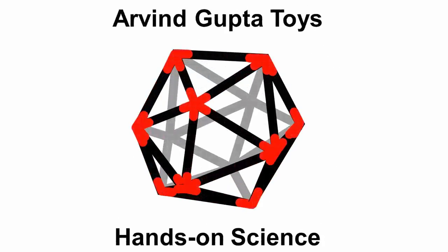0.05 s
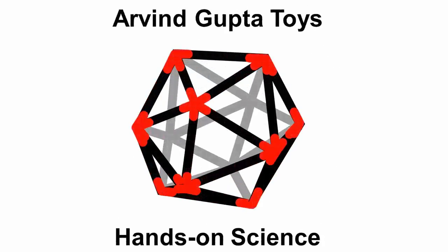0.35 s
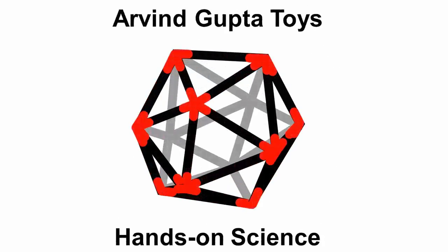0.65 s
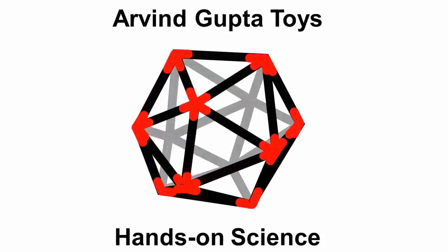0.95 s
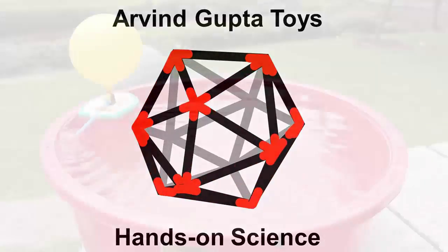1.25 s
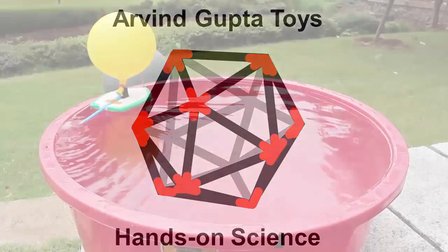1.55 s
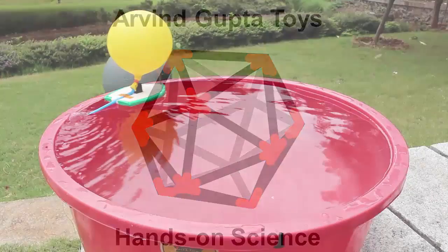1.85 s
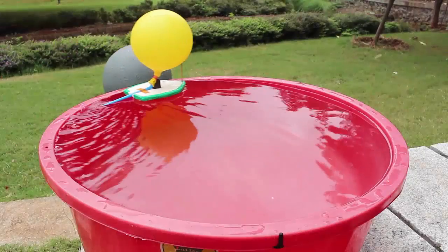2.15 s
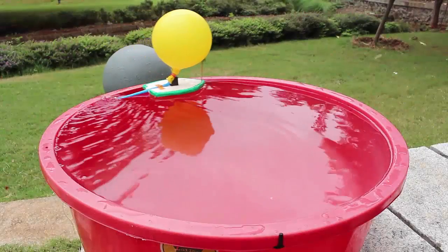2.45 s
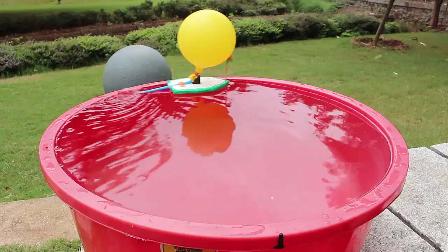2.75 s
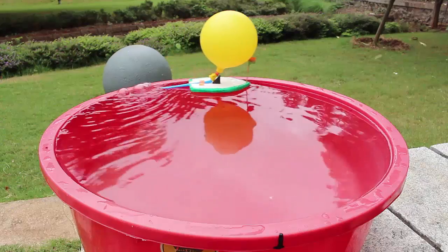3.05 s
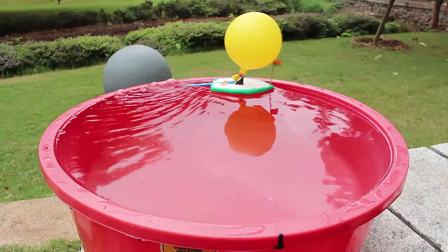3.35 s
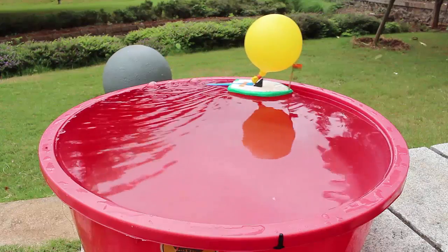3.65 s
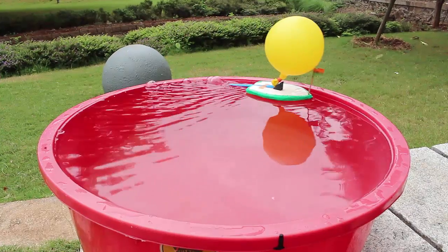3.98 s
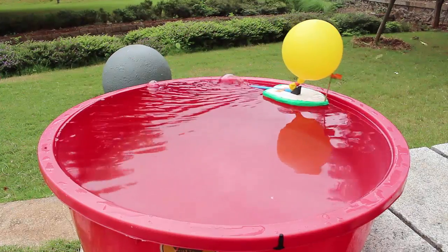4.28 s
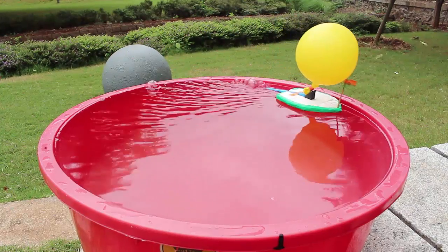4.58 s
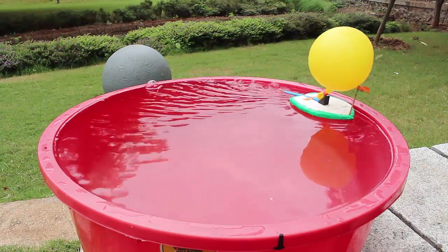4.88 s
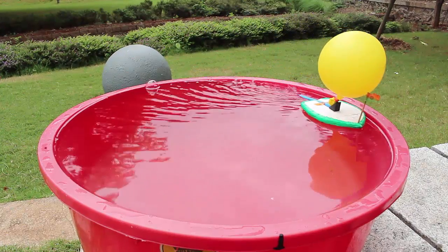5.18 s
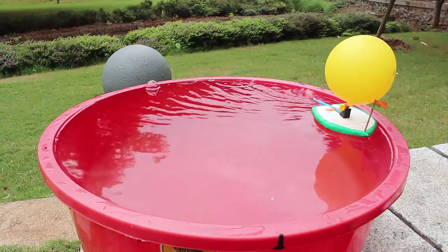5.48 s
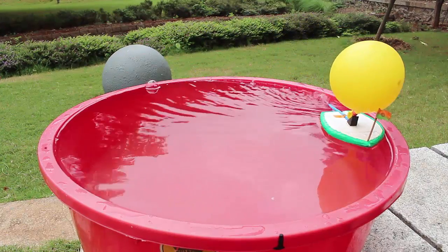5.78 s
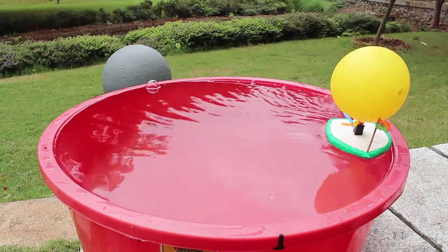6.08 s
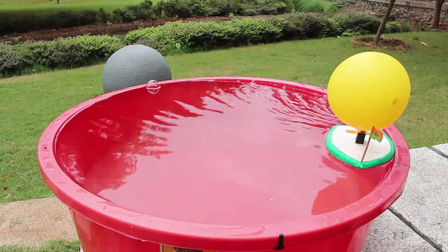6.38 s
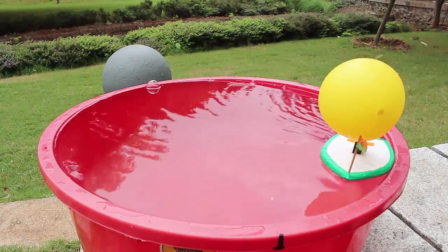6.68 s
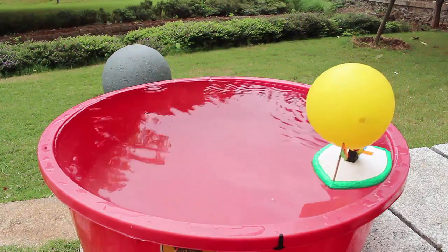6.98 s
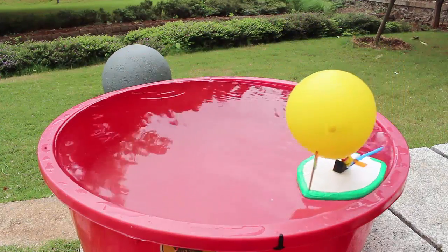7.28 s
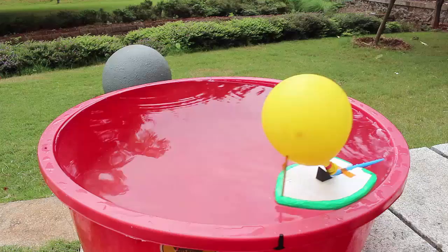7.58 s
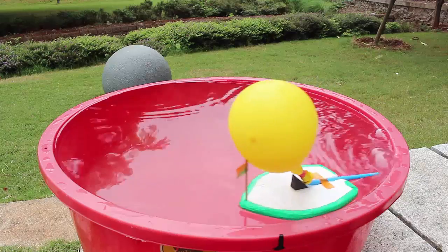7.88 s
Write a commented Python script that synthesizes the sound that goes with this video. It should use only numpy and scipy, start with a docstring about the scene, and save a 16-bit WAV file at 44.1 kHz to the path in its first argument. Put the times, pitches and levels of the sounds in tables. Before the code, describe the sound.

After brief dull room noise, a balloon-driven toy boat sputters and bubbles air through a straw in a tub of water.

```python
"""A balloon-driven toy boat sputters round a plastic tub outdoors, blowing through a straw at the waterline.
Bubbles burst and their cavities ring, air whistles through swelling and shrinking pockets of water,
and the jet hisses amid fine spray. The straw's air column and an echo off the tub wall colour the sound,
over a low churning of water. Dull room noise comes first and gives way abruptly to the boat at 1.64 s."""
import sys
import numpy as np
from scipy import signal
from scipy.fft import rfft, irfft
from scipy.io import wavfile
from scipy.ndimage import map_coordinates

SR = 44100
rng = np.random.default_rng(int(sys.argv[2]) if len(sys.argv) > 2 else 0)


def transcribe(u):
    """Save the signal u as a 16-bit wav file named by the first command-line argument.

    u: samples, shape (n,) or (channels, n), limited to [-1, 1]; the rate is SR.
    q: integer samples, one column per channel.
    """
    v = np.clip(np.atleast_2d(u).T, -1, 1)
    q = np.round(v * 32767).astype(np.int16)
    wavfile.write(sys.argv[1], SR, q)


N = 349713
TIME = np.arange(N) / SR
BOAT_START_S, BAND_LIMIT_HZ, TYPICAL_BURST_HZ = 1.638, 16100, 2000
RING_GLIDE_OCTAVES = 0.052  # rise in pitch during one decay time

# Levels in the tables are relative: each source applies its own gain.
# loud bursting bubbles: t/s, ring level/dB, f/Hz, ring decay time/s, snap level/dB
BURSTS = [(1.6414, -3, 2030, 0.004, -19), (1.6541, -1.6, 960, 0.00073, -24),
          (1.6657, 4.5, 1050, 0.0015, -9), (1.6836, 5, 1370, 0.004, -4), (1.7087, 5, 2850, 0.0027, -16),
          (1.7262, 2, 3050, 0.0036, -14), (1.7722, 5.5, 2030, 0.0015, -16), (1.7842, 10, 2220, 0.001, -9),
          (1.822, -4, 920, 0.001, -19), (1.8336, 8.5, 1080, 0.0007, -5), (1.9207, 3, 1225, 0.0013, -4.5),
          (1.9345, -3.5, 800, 0.0041, -15), (1.9898, 4, 2200, 0.0012, -12), (2.0756, 5.5, 2010, 0.003, -6),
          (2.159, -4.5, 900, 0.0014, -14), (2.1732, 9, 3040, 0.001, -3), (2.2864, 1.8, 2290, 0.00038, -13),
          (2.3897, -2, 875, 0.0037, -10), (2.4951, 2.1, 2060, 0.003, -15), (2.508, 4.5, 3050, 0.001, -10),
          (2.5387, 6.5, 3000, 0.0013, -9), (2.5517, 1.4, 830, 0.0039, -17),
          (2.5693, -2.5, 1180, 0.0021, -15), (2.589, -9, 1490, 0.0022, -10), (2.6347, 1, 950, 0.0011, -9),
          (2.6581, -4, 840, 0.0034, -10), (2.6994, 0.6, 2060, 0.0025, -16), (2.7236, -3, 1970, 0.0034, -16),
          (2.7814, 0.5, 900, 0.003, -15), (2.7904, -2.5, 960, 0.00067, -7), (2.8242, -3, 1400, 0.0006, -22),
          (2.843, 2.5, 1310, 0.0028, -17), (2.9197, 1.5, 830, 0.0037, -4), (3.0172, 2.5, 930, 0.003, -28),
          (3.0252, 7.5, 1470, 0.00031, 3.5), (3.0637, -2.5, 1280, 0.0029, -25),
          (3.1084, -1.5, 894, 0.0033, -22), (3.1277, -1.5, 980, 0.0015, -19),
          (3.1363, 8.5, 1410, 0.0023, -9), (3.2232, -2, 3140, 0.0014, -6), (3.2407, 5, 1880, 0.0014, -15),
          (3.3326, -1.6, 920, 0.002, -4.5), (3.342, 2.5, 1410, 0.0008, -8), (3.4225, -3, 903, 0.0029, -30),
          (3.4426, 4.1, 815, 0.0058, -4), (3.5388, 4.4, 2100, 0.00016, -28), (3.5512, 5.5, 850, 0.0027, -2),
          (3.5867, -2.1, 980, 0.0014, -13), (3.6226, 3, 2000, 0.00086, -22), (3.642, -3, 810, 0.0014, -13),
          (3.6726, -6, 920, 0.0011, -8), (3.733, -1.5, 1820, 0.002, -19), (3.8262, -4, 3000, 0.0006, -20),
          (3.8372, 3.5, 1620, 0.0006, -5), (3.8477, 6.5, 846, 0.0023, -0.5), (3.9207, -3, 920, 0.002, -12),
          (3.9317, -1.5, 902, 0.0014, 0.5), (3.9771, -0.7, 1670, 0.0034, -14),
          (4.0955, 4.0, 3070, 0.0027, -6), (4.1368, 2, 946, 0.001, -14), (4.157, 8, 2630, 0.00036, -4),
          (4.2837, -2, 1930, 0.003, -17), (4.2985, -2, 2060, 0.00025, 0.5), (4.311, 6, 1250, 0.0027, -12),
          (4.4108, 1, 1320, 0.0031, -10), (4.4242, -0.5, 1990, 0.002, -12), (4.5528, -3.5, 985, 0.0028, -7),
          (4.569, -1, 1390, 0.0044, -4.5), (4.6346, -1, 3100, 0.0004, 6), (4.6699, 2.5, 1960, 0.0029, -9),
          (4.7541, 1, 1570, 0.003, -16), (4.7659, 6.5, 1920, 0.0023, -11), (4.8512, 7.5, 1760, 0.0047, -6),
          (4.9246, 10.5, 2080, 0.0013, -8), (4.935, 3.5, 2150, 0.00081, -2),
          (4.9878, -0.5, 1510, 0.0025, -1.5), (5.0021, -2.5, 843, 0.0013, -5),
          (5.0568, -3.5, 900, 0.0014, -1.5), (5.1894, 1, 1890, 0.00031, -0.5),
          (5.2654, 0.5, 2100, 0.0049, -14), (5.2871, -0.8, 2260, 0.001, -3.5),
          (5.3178, -9, 1620, 0.0047, -6), (5.3323, -2.8, 1960, 0.0022, -8), (5.368, 3.1, 2110, 0.0014, -6),
          (5.3811, 2.8, 1990, 0.0012, -7), (5.442, 5.5, 2040, 0.0021, -8), (5.5181, 3.5, 2650, 0.00043, -1),
          (5.543, -4.1, 930, 0.005, -12), (5.5833, 6.5, 1370, 0.0035, 2.5), (5.5961, -6, 820, 0.0022, -13),
          (5.6645, 1.5, 2130, 0.0022, -7), (5.778, 3.5, 1610, 0.003, -9), (5.7936, 1, 2790, 0.0017, -14),
          (5.8806, 2, 1910, 0.002, -5.5), (5.9527, -0.4, 1920, 0.0006, -4), (5.9641, 4.5, 2360, 0.0006, 4),
          (6.1279, 2, 2280, 0.0012, -1.5), (6.1369, 0, 2110, 0.002, -1.5), (6.2101, 0, 2130, 0.0045, -2),
          (6.2222, 9, 2800, 0.0005, -3), (6.2609, 9.5, 2360, 0.0013, 8), (6.3043, 5.5, 2080, 0.0026, 1),
          (6.3397, 9, 2170, 0.0024, -5), (6.4537, -0.5, 3030, 0.003, -6), (6.5066, 11, 2820, 0.00041, 2),
          (6.5197, -0.5, 1550, 0.0004, 2), (6.6018, 4, 2130, 0.0034, -22), (6.622, 9.5, 2860, 0.00082, 2),
          (6.6376, 6, 1900, 0.0037, 1), (6.6913, -3, 2940, 0.00037, -3), (6.7532, -3, 1600, 0.002, -4),
          (6.7984, 2, 2660, 0.00037, -2), (6.812, 5, 2820, 0.00066, 2.5), (6.9018, 4.1, 3040, 0.00027, 1),
          (6.9766, 11, 2930, 0.0012, 2.5), (6.9963, -4.5, 1780, 0.004, -1), (7.148, 1.5, 2010, 0.004, -1.5),
          (7.1688, 7.5, 2750, 0.00037, 5.5), (7.2081, 4.5, 2840, 0.00047, -2),
          (7.2572, 5, 1860, 0.00015, 3), (7.2794, -4, 1860, 0.0017, -17), (7.3453, -1, 2030, 0.0015, -7),
          (7.3589, 7.5, 2280, 0.00083, 3.5), (7.432, -0.5, 1900, 0.00052, -5),
          (7.4697, 8.5, 2970, 0.00076, 5.5), (7.5207, 8, 2970, 0.00092, 2.5), (7.5596, -2, 2230, 0.004, -9),
          (7.5768, -1, 2440, 0.0011, 1), (7.6352, -1.5, 2940, 0.00054, -1), (7.74, 2.7, 2750, 0.00044, -2),
          (7.873, 7, 1960, 0.00017, -5)]
# spectrum of the knock that a burst gives the straw: f/Hz, level/dB
KNOCK_SPECTRUM = [(100, -31), (350, -23), (600, 1.5), (900, 1.5), (1300, -6), (2000, 3.5), (3000, -22.5),
                  (6000, -31.5), (16000, -75)]
# spectrum of a tearing film: f/Hz, level/dB
SNAP_SPECTRUM = [(300, -18.5), (1200, -10.5), (2200, 3.5), (3400, 6.5), (5000, -1.5), (7500, 0),
                 (10000, -14), (13000, -25.5), (16000, -19)]
# modes of the straw's air column: f/Hz, bandwidth/Hz, peak height/dB
STRAW_MODES = [(910, 220, 10), (2100, 420, 5), (3130, 350, 8), (4500, 280, 10), (5880, 480, 11),
               (6950, 550, 6), (8050, 380, 8), (9600, 450, 7), (10600, 450, 6), (12100, 750, 9),
               (13600, 450, 5)]
# raspy squirts of air: t/s, duration/s, level/dB, first f/Hz, last f/Hz
AIR_SQUIRTS = [(1.69, .045, -30, 2180, 3770), (1.76, .05, -33, 2200, 4730),
               (1.995, 0.042, -31.5, 2100, 3470), (2.08, 0.048, -34, 2670, 3750),
               (2.175, 0.075, -37, 2500, 3900), (2.373, .028, -34, 4100, 2470),
               (2.5, 0.069, -40, 2470, 5540), (2.71, 0.099, -34, 2000, 4030),
               (2.807, .035, -43, 3020, 1100), (3.203, .041, -40, 3570, 1750),
               (3.484, 0.057, -37, 4160, 2100), (3.6, 0.055, -33.5, 2100, 4450),
               (3.677, .06, -40, 3330, 1720), (3.8, 0.034, -46, 3000, 1800),
               (4.038, .055, -34.5, 1580, 4600), (4.53, .05, -37, 2000, 1400),
               (4.879, 0.055, -47, 4260, 2280), (5.022, 0.024, -42, 2930, 1470),
               (5.068, .036, -34.5, 3000, 2000), (5.27, 0.086, -39, 2690, 1910),
               (5.4, 0.084, -38, 1800, 2800), (5.8, .05, -34, 2320, 3140),
               (5.983, 0.027, -31.5, 4150, 2050), (6.227, 0.027, -34, 4240, 2920),
               (6.457, 0.038, -33.5, 2600, 3560), (6.57, 0.053, -35, 2100, 3600),
               (6.66, 0.057, -32, 1600, 3540), (7.15, .06, -45, 2200, 4500)]
# sound of the air flow: t/s, gurgle level/dB, hiss level/dB
AIR_FLOW = [(1.64, -39, -44), (1.83, -41, -49.5), (2.85, -38, -47.5), (3.64, -35, -45.5), (4.3, -41, -44.5),
            (5.48, -40.5, -43.5), (6.37, -44.5, -42.5), (6.72, -40.5, -37.5), (7.93, -44, -45)]
# focused band of the jet's hiss: t/s, f/Hz, level/dB
JET_BAND = [(1.7, 5960, -79), (2.4, 6430, -57.5), (3.1, 6260, -51), (3.6, 6550, -53), (4.4, 7130, -52),
            (5.7, 6980, -59), (7.0, 7000, -65), (7.9, 7100, -58)]
# hiss spectrum with the boat on the far side: f/Hz, level/dB
FAR_HISS_SPECTRUM = [(300, 2), (900, 8), (2000, -18), (3500, 10), (5000, 4), (6500, 9), (9000, 0),
                     (12000, -1), (16000, -11)]
# hiss spectrum with the boat on the near side: f/Hz, level/dB
NEAR_HISS_SPECTRUM = [(300, -6), (900, -24), (2000, 8), (3500, 12.5), (5000, 3.5), (6500, 11.5),
                      (9000, 1.5), (12000, -3.5), (16000, -15)]
# spurts of fine spray: t/s, nominal duration/s, level/dB
SPRAY_SPURTS = [(1.803, 0.021, -45), (2.217, .035, -43), (2.76, 0.033, -41), (2.817, .015, -39),
                (2.962, .02, -41), (3.257, .06, -39.5), (3.37, .012, -39), (3.47, 0.052, -43.5),
                (3.652, 0.066, -41.5), (3.867, 0.094, -38), (4.07, 0.032, -41), (4.64, 0.044, -32),
                (4.885, 0.028, -35), (5.027, 0.018, -39.5), (5.838, 0.02, -42.5), (5.99, 0.074, -38.5),
                (6.103, .025, -45), (6.235, .022, -45), (6.67, 0.038, -40), (6.95, 0.021, -38),
                (7.185, 0.033, -37), (7.492, .025, -37), (7.593, 0.027, -40)]
# spectrum of the spray: f/Hz, level/dB
SPRAY_SPECTRUM = [(1000, -28), (2500, -7), (4000, 4), (5200, -6), (8000, -0.5), (11000, -0.5),
                  (13000, -5.5), (16000, 2)]
# echo off the tub wall as the boat moves: t/s, delay/ms, reflection factor/1
WALL_ECHO = [(1.7, .505, .42), (2.4, .485, .42), (3.0, .45, .62), (3.5, .41, .28), (4.0, .372, .42),
             (5.0, .3, .3), (6.0, .24, .2), (7.0, .19, .2), (7.9, .19, .15)]
# spectrum of stirred water and open air: f/Hz, level/dB
CHURN_SPECTRUM = [(20, -7), (38, -7), (60, 0.5), (110, -0.5), (180, -6.5), (280, -12.5), (450, -17.5),
                  (800, -25), (2000, -28.5), (8000, -41)]
# opening room noise: t/s, rumble level/dB, hiss level/dB
ROOM_LEVELS = [(0, -40.5, -49.5), (.62, -40.5, -48.5), (.72, -44, -54), (.8, -50.5, -56.5),
               (.9, -55.5, -51), (1.17, -59, -48.5), (1.24, -40.5, -47), (1.36, -52.5, -48),
               (1.62, -56, -52.5)]
# spectrum of the room's rumble: f/Hz, level/dB
ROOM_RUMBLE_SPECTRUM = [(20, -19), (100, -25), (150, -7), (200, -2), (330, -6), (480, -12), (800, -19.5),
                        (1500, -27), (4000, -67)]
# spectrum of the soft opening hiss, with a dip near 11 kHz and faint top hiss above: f/Hz, level/dB
OPENING_HISS_SPECTRUM = [(20, 10), (50, 7), (120, -2), (1000, -3), (2500, -1), (4300, 0), (6000, -10),
                         (8500, -19), (10000, -27), (11500, -32), (15500, -22)]
# soft bumps and a tick in the room: t/s, level/dB, f/Hz, spread/Hz, rise time/s, decay time/s
ROOM_BUMPS = [(0.514, -23, 198, 40, 0.016, 0.026), (0.592, -34, 1900, 1800, .001, 0.0059),
              (1.193, -38.5, 117.7, 110, 0.0056, .1)]


def bursts(ring_db=-1.5, knock_db=-8, snap_db=-2, splash_db=-21, swell_db=-12,
           rise_s=0.00026, splash_s=0.0019, swell_s=0.004, size=500):
    """Impulse excitation: a film snaps with a tiny splash, ringing the cavity and the straw."""
    rings, knocks, snaps = np.zeros((3, N))
    t = np.arange(size) / SR
    for s, db, hz, decay, film_db in BURSTS + small_bursts():
        add(rings, s, with_energy(ring(hz, decay, RING_GLIDE_OCTAVES / decay, rise_s), db + ring_db))
        # the knock grows slowly with the level and pitch of the burst
        add(knocks, s, amp([knock_db + 0.5 * db + 0.5 * np.log2(hz / TYPICAL_BURST_HZ)]))
        splash = amp(splash_db) * rng.standard_normal(size) * np.exp(-t / splash_s)
        add(snaps, s + rise_s, with_energy((t == 0) + splash, film_db))
        # a brief swell of noise just before each snap
        swell = rng.standard_normal(size) * np.exp(-t[::-1] / swell_s)
        add(snaps, s - t[-1], with_energy(swell, film_db + swell_db))
    rings = signal.lfilter(*signal.butter(2, 590, "high", fs=SR), rings)
    knocks = colour(knocks, KNOCK_SPECTRUM, STRAW_MODES)
    return rings + knocks + amp(snap_db) * colour(snaps, SNAP_SPECTRUM, STRAW_MODES)


def small_bursts(per_burst=0.8, scatter_s=0.09, low_hz=900, high_hz=2600, decay_s=0.0019,
                 ring_db=-5.5, snap_db=-10.5, spread_db=2):
    """Random clustering: faint bubbles burst around the loud ones. Gives rows like BURSTS."""
    rows = []
    for which, pitch, late, early, size in rng.random((int(per_burst * len(BURSTS)), 5)):
        s = BURSTS[int(which * len(BURSTS))][0] + scatter_s * (late - early)
        offset_db = spread_db * (2 * size - 1)
        hz = low_hz * (high_hz / low_hz) ** pitch
        rows.append((s, ring_db + offset_db, hz, decay_s, snap_db + offset_db))
    return rows


def ring(hz, decay_s, octaves_per_s, rise_s):
    """Damped oscillation: an air cavity rings briefly, its pitch sliding as its mouth changes."""
    t = np.arange(900) / SR
    pitch = np.minimum(hz * 2 ** (octaves_per_s * t), SR / 2)
    envelope = (1 - np.exp(-t / rise_s)) * np.exp(-t / decay_s)
    return envelope * np.sin(2 * np.pi * np.cumsum(pitch) / SR)


def plops(gain_db=-6, pitch_hz=1180, decay_s=0.0031, brief_s=0.00049, scatter=0.069, rise_s=0.00051):
    """Cavity resonance: after the briefest cracks, water closes round a larger pocket that rings low."""
    out = np.zeros(N)
    for (s, db, _, crack_s, _), detune in zip(BURSTS, rng.standard_normal(len(BURSTS))):
        plop = ring(pitch_hz * np.exp(scatter * detune), decay_s, RING_GLIDE_OCTAVES / decay_s, rise_s)
        add(out, s + rise_s, np.exp(-crack_s / brief_s) * with_energy(plop, db + gain_db))
    return out


def whistles(rows, relative_width, wobble, tick_db, overtone=2.59, overtone_db=-15,
             ticks_per_s=220, overhang_s=0.006):
    """Forced resonance: rushing air and tiny pops drive a pocket whose pitch slides with its volume."""
    out = np.zeros(N)
    ticks = (rng.random(N) < ticks_per_s / SR) * rng.uniform(-1.8, 1, N)
    drive = rng.standard_normal(N) + amp(tick_db) * ticks
    waver = np.exp(wobble * wander(126))
    for s, length, db, first_hz, last_hz in rows:
        n = int((length + 2 * overhang_s) * SR)
        span = slice(int(s * SR) - n, int(s * SR))
        hz = np.geomspace(first_hz, last_hz, n) * waver[span]
        width = relative_width * hz.mean()
        upper = resonate(drive[span], overtone * hz, overtone * width) * (overtone * hz < BAND_LIMIT_HZ)
        sweep = unit(resonate(drive[span], hz, width)) + amp(overtone_db) * unit(upper)
        add(out, s - overhang_s, amp(db) * sweep * signal.windows.tukey(n, 0.4))
    return out


def pockets(lead_s=0.028, trail_s=0.018, octaves_per_s=13.9, spread=0.3, whistle_db=-47,
            lone_per_s=5, lone_db=-42.5, low_hz=1160, high_hz=1860):
    """Resonance rises as a pocket shrinks, through each burst or alone. Gives rows like AIR_SQUIRTS."""
    centres = [(s, hz, whistle_db + 0.2 * db) for s, db, hz, *_ in BURSTS]
    running_s = N / SR - BOAT_START_S
    for when, pitch in rng.random((int(lone_per_s * running_s), 2)):
        centres.append((BOAT_START_S + when * running_s, low_hz * (high_hz / low_hz) ** pitch, lone_db))
    rows = []
    for (s, hz, db), deviation in zip(centres, rng.uniform(-1.1, 1, (len(centres), 3))):
        lead, trail, climb = np.array([lead_s, trail_s, octaves_per_s]) * np.exp(spread * deviation)
        db -= 0.5 * np.log2(hz / TYPICAL_BURST_HZ)
        rows.append((s - lead, lead + trail, db, hz * 2 ** (-climb * lead), hz * 2 ** (climb * trail)))
    return rows


def gurgle(bubbles_db=-5, wash_db=-4, per_s=170, spread_db=11, cycles=2.9, pitches=36):
    """Bubble resonance: many small bubbles ring over a wash of noise in the straw's lowest modes."""
    bubbles = np.zeros(N)
    for hz in np.geomspace(800, 3300, pitches):
        onsets = rng.integers(0, N, int(per_s * N / SR / pitches))
        sizes = np.minimum(rng.exponential(1, len(onsets)), 3)
        glides = rng.normal(12, 36.5, len(onsets))
        for onset, size, glide in zip(onsets, sizes, glides):
            add(bubbles, onset / SR, amp(spread_db * size) * ring(hz, cycles / hz, glide, 0.00056))
    wash = noise(KNOCK_SPECTRUM, STRAW_MODES) * amp(4 * wander(63))
    flow_db, _ = curves(AIR_FLOW)
    return amp(flow_db) * (amp(bubbles_db) * unit(bubbles) + amp(wash_db) * unit(wash))


def jet_hiss(spits_per_s=210, spit_db=5, spit_share=0.18, surge_db=1.15, near_at_s=5.6, turn_s=0.05):
    """Turbulent noise: the jet spits unevenly into the straw's modes, gaining body on the near side."""
    spit_phase = np.cumsum(spits_per_s * np.exp(0.4 * wander(80))) / SR % 1
    spits = 1 + amp(spit_db) * np.exp(-spit_phase / spit_share)
    jet = rng.standard_normal(N) * spits * amp(surge_db * wander(14))
    far = amp(0.5) * unit(colour(jet, FAR_HISS_SPECTRUM, STRAW_MODES))
    near = amp(3.5) * unit(colour(jet, NEAR_HISS_SPECTRUM, STRAW_MODES))
    nearness = np.clip((TIME - near_at_s) / turn_s, 0, 1)
    band_hz, band_db = curves(JET_BAND)
    band = amp(band_db) * unit(resonate(jet, band_hz, width_hz=1100))
    _, flow_db = curves(AIR_FLOW)
    return band + amp(flow_db) * ((1 - nearness) * far + nearness * near)


def straw_pressure(sag=0.49, sag_s=0.018, loud_db=10):
    """Venting: each burst lets the relative pressure sag for a moment, the more the louder it is."""
    vents = np.zeros(N)
    for s, db, *_ in BURSTS:
        add(vents, s, amp([db - loud_db]))
    age = np.arange(SR // 4) / SR / sag_s
    return 1 / (1 + sag * signal.oaconvolve(vents, age * np.exp(1 - age))[:N])


def spray(spurt_db=1, steady_db=-17, lump_db=3, per_s=1400, spread_db=5, cycles=2.1, pitches=30):
    """Shot noise: chirps of tiny bubbles and droplets sum to a faint crackle with short spurts."""
    fizz = np.zeros(N)
    for hz in np.geomspace(2800, 13000, pitches):
        sizes = amp(spread_db * np.minimum(rng.exponential(1, N), 3))
        impulses = sizes * (rng.random(N) < per_s / pitches / SR)
        chirp = ring(hz, cycles / hz, rng.normal(40, 60), 0.0001)
        fizz += signal.oaconvolve(impulses, with_energy(chirp, 0))[:N]
    spurts = np.zeros(N)
    for s, length, db in SPRAY_SPURTS:
        window = signal.windows.tukey(int(1.5 * length * SR), 0.7)
        add(spurts, s - length / 4, amp(db + spurt_db) * window)
    _, flow_db = curves(AIR_FLOW)
    steady = amp(flow_db + steady_db + lump_db * wander(9.1))
    return (spurts + steady) * unit(colour(fizz, SPRAY_SPECTRUM))


def tub(x, scatter_db=-19, decay_s=0.0014, cutoff_hz=3000, size=1500):
    """Reflection: the tub scatters a brief tail, and the wall's moving echo interferes with the sound."""
    t = np.arange(size) / SR
    tail = rng.standard_normal(size) * np.exp(-t / decay_s) * (t > 0.002)
    x = x + signal.oaconvolve(x, with_energy(tail, scatter_db))[:N]
    delay_ms, reflection = curves(WALL_ECHO)
    echo = map_coordinates(x, [np.arange(N) - delay_ms * SR / 1000], order=3)
    # the low rim reflects only short waves
    echo -= signal.filtfilt(*signal.butter(2, cutoff_hz, fs=SR), echo)
    return x + reflection * echo


def churn(level_db=-40, lump_db=2):
    """Amplitude-modulated noise: the lumpy low rumble of stirred water and open air."""
    return amp(level_db) * unit(noise(CHURN_SPECTRUM) * amp(lump_db * wander(42)))


def room():
    """Ambient noise: dull indoor rumble and soft hiss, with bumps that are decaying bands of noise."""
    rumble_db, hiss_db = curves(ROOM_LEVELS)
    out = amp(rumble_db - 0.5) * noise(ROOM_RUMBLE_SPECTRUM)
    out += amp(hiss_db + 1.5) * noise(OPENING_HISS_SPECTRUM)
    for s, db, hz, spread, rise, decay in ROOM_BUMPS:
        t = np.maximum(TIME - s, 0)
        band = ((wander(spread) + 1j * wander(spread)) * np.exp(2j * np.pi * hz * t)).real
        out += amp(db) * (1 - np.exp(-t / rise)) * np.exp(-t / decay) * band
    return out


def resonate(x, hz, width_hz):
    """Resonance of gain 1 that follows the curve hz; two poles give it steep sides."""
    carrier = np.exp(2j * np.pi * np.cumsum(hz) / SR)
    r = np.exp(-np.pi * width_hz / SR)
    return 2 * (carrier * signal.lfilter([(1 - r) ** 2], [1, -2 * r, r * r], x / carrier)).real


def colour(x, spectrum, modes=(), size=8192):
    """Minimum-phase filtering by a smooth spectrum with resonances on top; the response has energy 1."""
    hz = np.fft.rfftfreq(size, 1 / SR)
    f, db = np.transpose(spectrum)
    db = np.interp(np.log(hz + 1), np.log(f + 1), db)
    for centre, width, height in modes:
        db += height / (1 + (2 * (hz - centre) / width) ** 2)
    cepstrum = irfft(np.log(amp(db)))
    cepstrum[1:size // 2] *= 2  # folding the cepstrum makes the response causal
    cepstrum[size // 2 + 1:] = 0
    taps = irfft(np.exp(rfft(cepstrum)))[:size // 2]
    return signal.oaconvolve(x, with_energy(taps, 0))[:N]


def noise(spectrum, modes=()):
    """Stationary coloured noise of rms 1."""
    return unit(colour(rng.standard_normal(N), spectrum, modes))


def wander(rate_hz):
    """Random fluctuation of rms 1, low-passed at about rate_hz."""
    hz = np.fft.rfftfreq(N, 1 / SR)
    return unit(irfft(rfft(rng.standard_normal(N)) / (1 + (hz / rate_hz) ** 2) ** 2, N))


def curves(rows):
    """Linear interpolation of each column of a table in time."""
    s, *columns = np.transpose(rows)
    return [np.interp(TIME, s, column) for column in columns]


def add(mix, s, sound):
    """Superposition of a sound on the mix at time s."""
    part = mix[max(round(s * SR), 0):][:len(sound)]
    part += sound[:len(part)]


def amp(db):
    """Amplitude ratio of a level in decibels."""
    return 10 ** (np.asarray(db) / 20)


def unit(x):
    """Normalisation to rms 1."""
    return x / np.sqrt(np.mean(x ** 2) + 1e-20)


def with_energy(x, db):
    """Normalisation of a short sound to an energy level of db."""
    return amp(db) * x / (np.linalg.norm(x) + 1e-12)


def scene():
    """Superposition: the boat's sources sound together in the tub, cutting in after the room noise."""
    boat = bursts() + plops()
    boat += whistles(pockets(), relative_width=0.06, wobble=0.033, tick_db=29.5)  # faint and smooth
    boat += whistles(AIR_SQUIRTS, relative_width=0.19, wobble=0.1, tick_db=31)  # loud and raspy
    boat += gurgle() + straw_pressure() * jet_hiss() + spray()
    outdoors = tub(boat) + churn()
    crossfade = np.clip((TIME - BOAT_START_S) / 0.0024, 0, 1)
    return (crossfade * outdoors + (1 - crossfade) * room())[None]


def record(dry):
    """Saturation rounds the loudest peaks; a low-pass filter then limits the band."""
    clipped = dry / (1 + (dry / 0.64) ** 8) ** (1 / 8)
    lowpass = signal.firwin(401, BAND_LIMIT_HZ, window=("kaiser", 9), fs=SR)
    return signal.oaconvolve(clipped, lowpass[None], "same")


dry = scene()
out = record(dry)
transcribe(out)
```